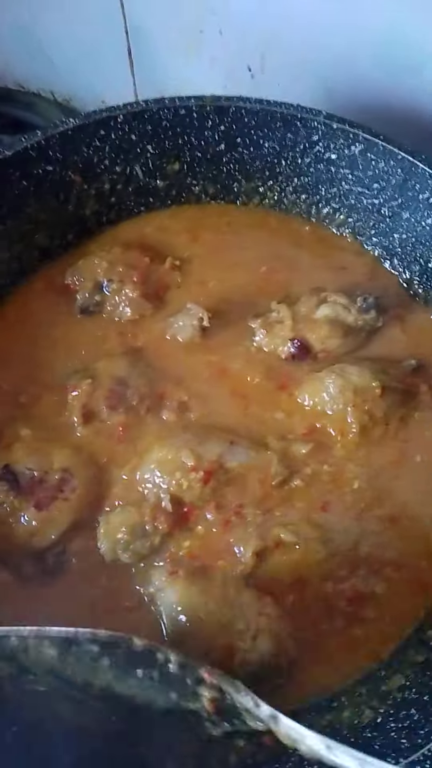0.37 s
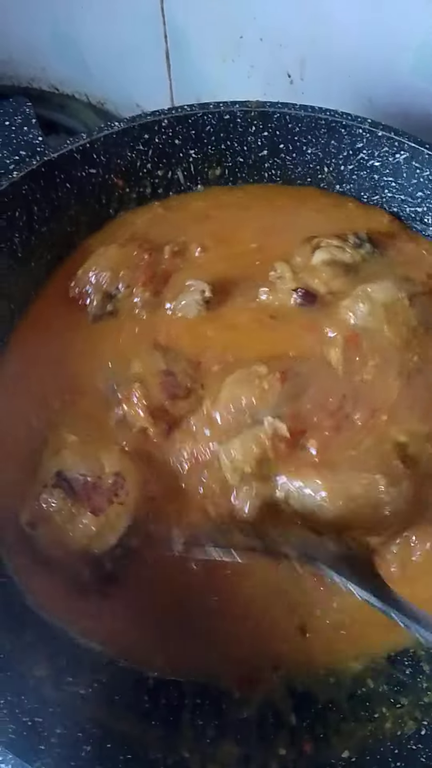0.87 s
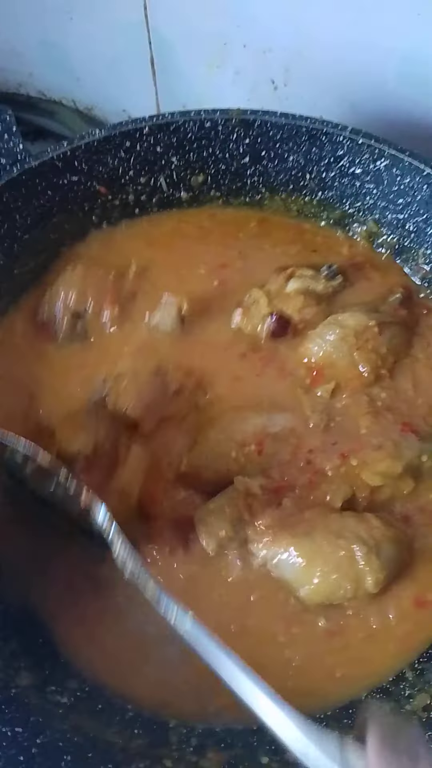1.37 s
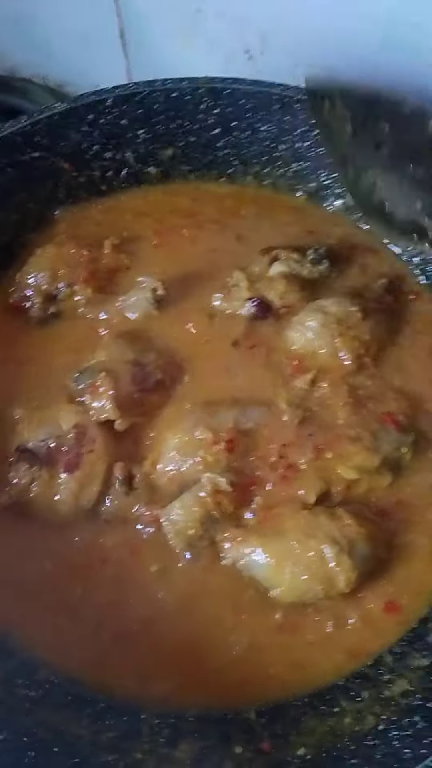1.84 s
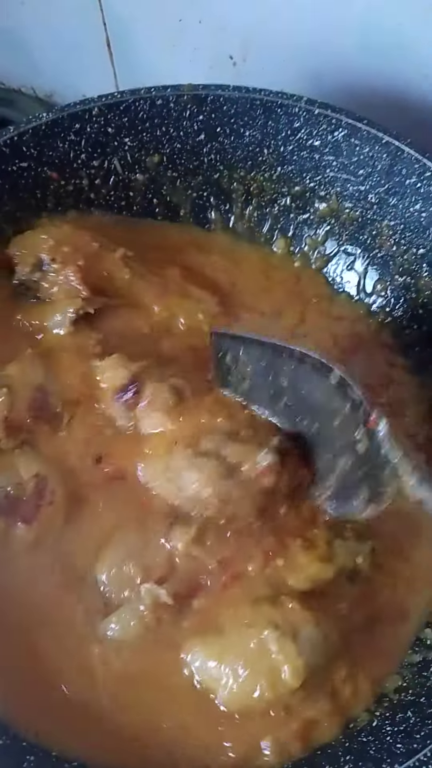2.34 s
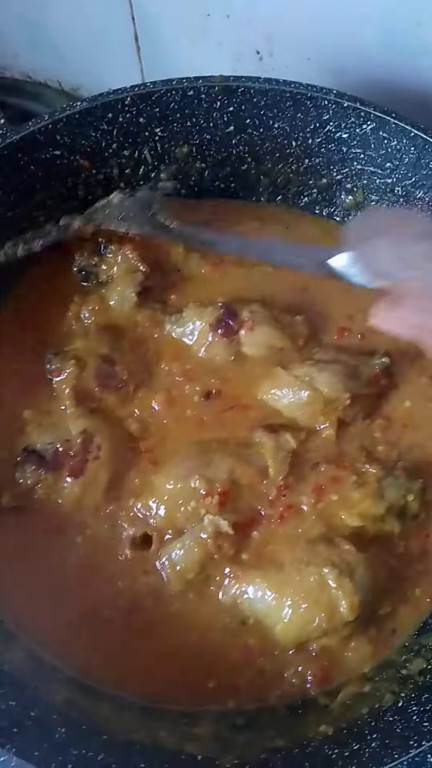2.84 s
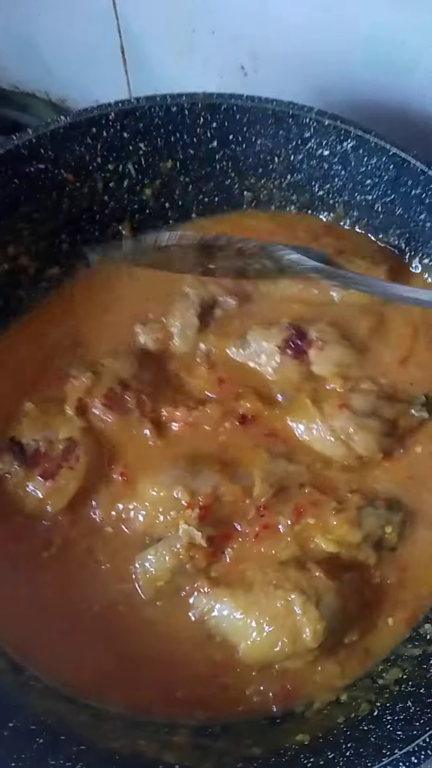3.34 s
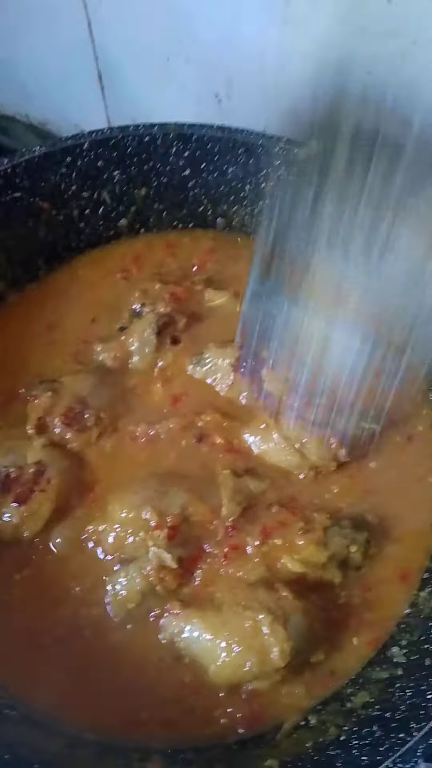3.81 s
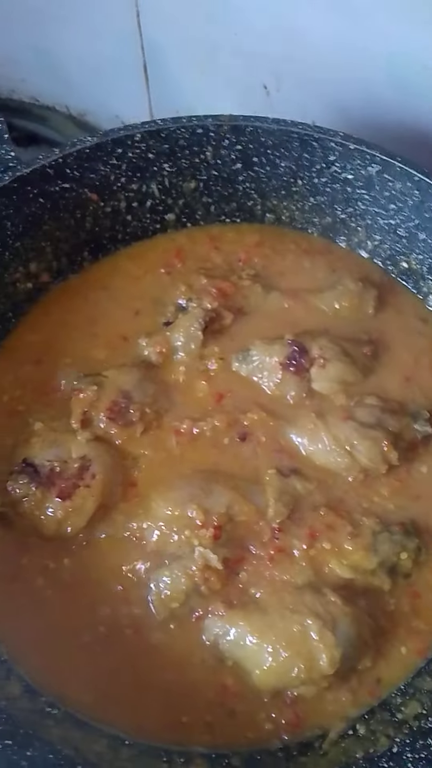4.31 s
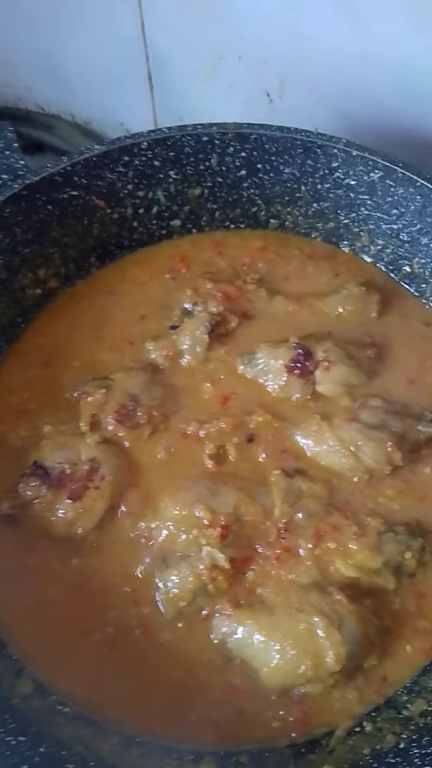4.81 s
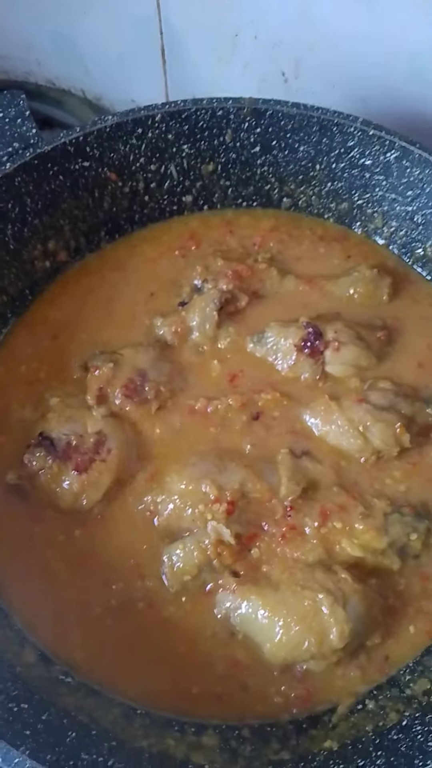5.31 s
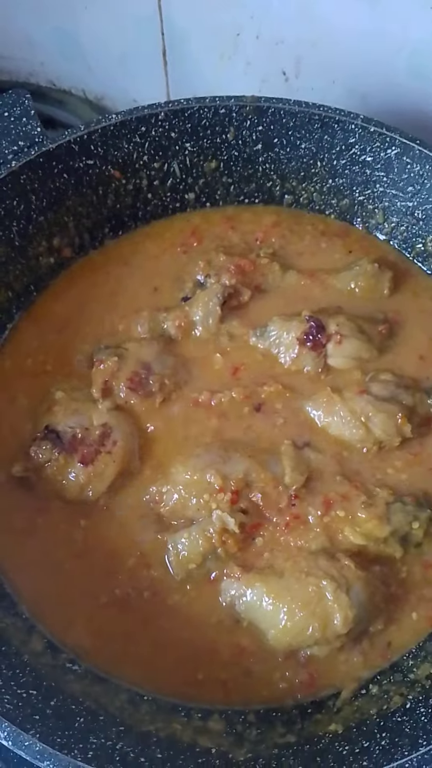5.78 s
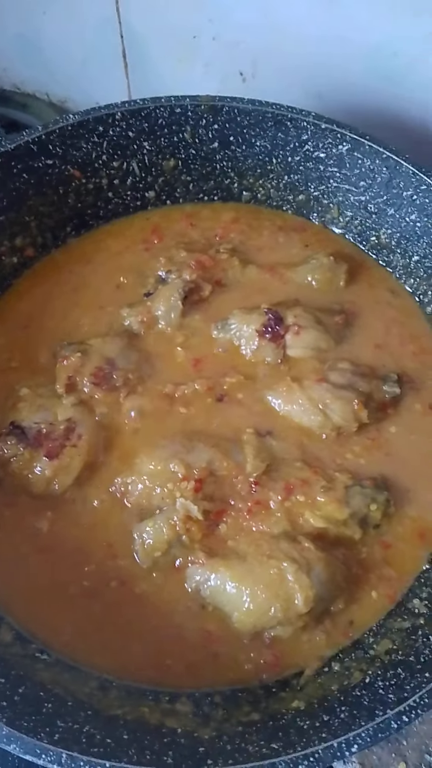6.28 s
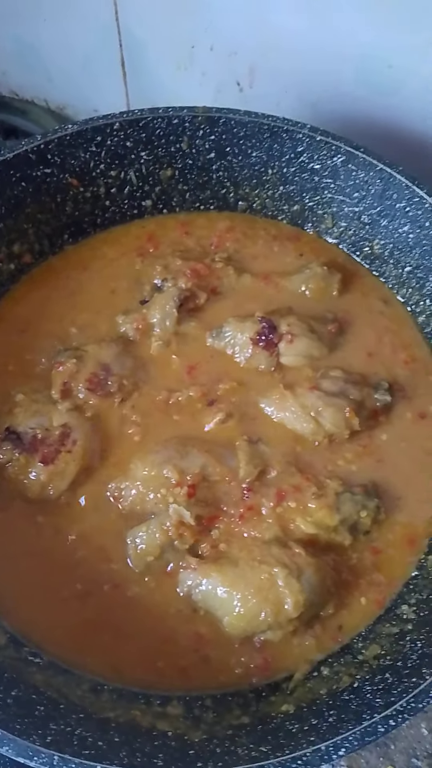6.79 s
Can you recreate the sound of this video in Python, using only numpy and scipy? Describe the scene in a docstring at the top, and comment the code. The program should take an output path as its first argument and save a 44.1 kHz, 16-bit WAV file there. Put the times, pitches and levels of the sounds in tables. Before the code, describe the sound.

Chicken simmers with small plopping bubbles and fine fat spits as a metal spatula knocks and scrapes a wok, then is set down ringing.

```python
"""Chicken simmering in a wok

Bubbles plop as short decaying sines and fat spits as pings in puffs of noise, over a hush of shaped noise.
A steel spatula lands on a coated wok and scrapes it: blows and uneven slips excite the modes of the metal.
It is then laid on a metal rest that rings, and one knock sounds on the counter; a few low bumps lie beneath.
Tiles answer with discrete echoes and a small kitchen with a decaying tail of noise."""
import sys
import numpy as np
from scipy import signal
from scipy.fft import rfft, irfft, next_fast_len
from scipy.io import wavfile
from scipy.ndimage import uniform_filter1d, map_coordinates

SR = 44100
rng = np.random.default_rng(int(sys.argv[2]) if len(sys.argv) > 2 else 0)


def generate_wav(signal):
    """Clip the signal to [-1, 1] and save it as 16-bit WAV at the path in sys.argv[1]."""
    frames = np.transpose(np.atleast_2d(signal))
    scaled = np.clip(frames, -1, 1) * 32767
    pcm = np.round(scaled).astype(np.int16)
    wavfile.write(sys.argv[1], SR, pcm)


def volts_from_decibels(level):
    """Turn decibel levels (scalar or array-like) into linear amplitude factors."""
    exponent = np.asarray(level, float) / 20
    return 10 ** exponent


N = 304731  # length in samples

# Scraping strokes, a list of contact points each: start_s, drone_level_db, favoured_pitch_hz,
# rasp_level_db, hiss_over_rasp_db, lowest_modes_over_drone_db
SCRAPE_STROKES = [
    [(0.47, -42.5, 918, -45, -4, -4.5), (0.506, -61, 802, -58, 1, 2), (0.58, -36, 850, -46, -1, -9),
     (0.602, -44, 764, -56.5, 1.5, -2), (0.662, -39, 708, -58.5, 4, -9), (0.688, -41, 1000, -61, 9, -11),
     (0.722, -30, 1060, -54.5, -2, -12), (0.744, -41, 985, -56.5, 2, -15.5),
     (0.876, -32, 720, -55, -4, -11.5), (0.964, -43.5, 640, -69.5, 1, -15), (1.0, -66, 706, -58, 0, -10)],
    [(1.31, -50, 812, -46, -11, 7), (1.38, -47.5, 753, -59.5, 3.5, -6), (1.456, -33.5, 790, -56.5, 5, -11),
     (1.494, -49, 910, -61.5, 7, 0), (1.53, -40, 1030, -63, 4, -4), (1.56, -67, 901, -89, -5, 12),
     (1.58, -58, 719, -80, -2, 0)],
    [(2.0, -49, 1060, -36, -13, -9), (2.022, -40, 1060, -54.5, -3, -15), (2.046, -55.5, 953, -57, -6, 14),
     (2.086, -44.5, 757, -67.5, 0, -8), (2.142, -45, 780, -52, -10, -5), (2.184, -52, 689, -62, -9, 13),
     (2.226, -32, 678, -53.5, -4.5, -5.5), (2.296, -43.5, 1010, -52, -12, -6),
     (2.4, -77, 727, -70, 5.5, -14)],
    [(2.74, -68, 686, -75, -14, -8), (2.758, -60, 776, -52, -6.5, -1), (2.79, -72, 927, -74, -2, 12)],
    [(2.89, -44, 1110, -52.5, 1, -22), (2.944, -43, 1100, -50.5, 8.5, -13.5),
     (2.984, -54.5, 1200, -61, -4, 2), (3.022, -69, 1130, -65, -6, -8), (3.05, -72, 837, -82, 0, -4)],
    [(3.2, -78, 1020, -84, -2, 14), (3.212, -51, 1040, -65, -2, 1.5), (3.256, -65, 831, -69, -2, 8),
     (3.304, -64, 1500, -64, -8, -12), (3.39, -65, 887, -72, 3, -14)],
]
# Spatula chattering as it settles on its rest: start_s, rasp_level_db
SETTLING_CHATTER = [(4.77, -42.5), (4.798, -49), (4.804, -59), (4.824, -55), (4.846, -42), (5.05, -62),
                    (5.12, -66)]
# Knocks on the wok: start_s, crack_level_db, body_level_db, share_of_free_ring_time (ratio),
# then two favoured pitches: pitch_hz, pitch_hz
WOK_KNOCKS = [(.4495, -27, -27.5, 0.18, 2100, 3080), (.4626, -32, -41, 0.1, 2130, 2800),
              (.568, -42, -31, 0.32, 1590, 2070), (.702, -50.5, -30, 0.2, 690, 1050),
              (.7085, -60, -21.5, 0.16, 1080, 1590), (.7187, -52, -45, 0.091, 890, 1590),
              (.7235, -62, -30, .14, 1090, 1590), (1.288, -35, -22.5, 0.28, 2080, 2950),
              (1.296, -44, -23, 0.11, 1100, 2100), (1.526, -70, -31.5, .14, 1100, 1460),
              (1.989, -42.5, -27, 0.45, 1026, 2090), (2.882, -39.5, -26, .8, 1192, 1820)]
# Knocks on the rest and on the counter: the same columns with one favoured pitch_hz
REST_KNOCKS = [(4.7511, -32.5, -23.5, 0.11, 736), (4.804, -41.5, -44, 0.44, 720),
               (4.8319, -43, -31, .3, 710), (4.8435, -39, -24, 1, 865)]
COUNTER_KNOCKS = [(5.3322, -49.5, -24, 0.77, 1380)]
# Vibration modes of each body: pitch_hz, level_db, free_t60_s
WOK_MODES = [(270, -10, .15), (368, -5, .15), (484, -4, .22), (581, -6, .15), (714, 0, .2), (830, -10, .15),
             (935, -5, .15), (1090, 0, .16), (1270, -11, .35), (1400, -6, .14), (1590, -5, .15),
             (1776, -13, .2), (2070, -11, .2), (2440, -15, .15)]
REST_MODES = [(170, -11, .1), (290, -11, .12), (400, -11, .15), (511, -8, .35), (620, -10, .2),
              (738, -5, .4), (834, -8, .65), (1000, -9, .35), (1125, -7, .4), (1276, -6, .55),
              (1314, -5, .45), (1544, -13, .5), (1755, -8, .4), (1873, -10, .45), (2035, -13, .75),
              (2218, -15, .45), (2439, -15, .9), (3397, -14, .27), (5399, -19, .3), (7617, -19, .25),
              (7908, -20, .25)]
COUNTER_MODES = [(450, -9, .05), (1080, -8, .06), (1486, 4, .085), (2046, -9, .07), (2632, -9, .07),
                 (4150, -14, .05), (4963, -14, .07)]
BLADE_MODES = [(2500, -5, .05), (2800, -4, .07), (3215, -4, .05), (3790, -4, .06), (4870, -10, .04),
               (6160, -11, .05)]
# Bubbles that stand out: start_s, level_db, starting_pitch_hz
CLEAR_BUBBLES = [(.09, -38, 1470), (.117, -40, 2140), (.144, -37.5, 840), (.222, -39.5, 1500),
                 (.379, -37, 1530), (1.016, -40, 900), (1.616, -36, 2780), (1.671, -36.5, 990),
                 (1.947, -35.5, 1310), (2.495, -33.5, 2600), (2.547, -31, 2720), (3.211, -39, 1470),
                 (3.227, -48, 940), (3.292, -44, 1440), (3.305, -36, 1490), (3.349, -34.5, 2660),
                 (3.439, -42.5, 1050), (3.528, -43, 834), (3.617, -39, 2700), (3.719, -38.5, 1080),
                 (3.781, -40.5, 1000), (3.825, -30, 1240), (3.906, -42, 806), (4.017, -40.5, 1210),
                 (4.086, -44, 1080), (4.335, -40, 2720), (4.482, -34.5, 1720), (4.536, -36.5, 1040),
                 (4.608, -43, 1190), (4.659, -43, 1080), (5.154, -34.5, 970), (5.205, -40, 1210),
                 (5.434, -39, 1090), (5.494, -37.5, 1480), (5.545, -38, 1470), (5.771, -40, 990),
                 (5.808, -31.5, 1085), (5.861, -42, 1120), (5.933, -38.5, 1440), (5.977, -41, 2920),
                 (6.015, -29.5, 1640), (6.206, -43, 1300), (6.249, -45, 1070), (6.368, -37.5, 1030),
                 (6.43, -36.5, 1090), (6.466, -39, 1130), (6.476, -36, 1170), (6.518, -33, 1820),
                 (6.717, -42.5, 1100), (6.813, -38.5, 1870), (6.824, -35, 920)]
# Spits of fat that stand out: start_s, ping_level_db, splash_level_db
CLEAR_SPITS = [(.0887, -43, -55), (.1363, -47.5, -50.5), (.3074, -42.5, -50.5), (.9981, -41, -59),
               (1.1413, -38, -48.5), (1.6172, -45, -53), (1.6284, -44.5, -49.5), (1.8527, -35, -50),
               (1.9818, -33, -38), (2.2732, -39, -61), (2.2865, -31.5, -59), (2.3133, -44, -64),
               (2.3515, -43.5, -68), (2.4954, -33, -45.5), (2.5452, -38, -48), (3.245, -39.5, -49),
               (3.3675, -42, -66), (3.5987, -44.5, -52), (3.6335, -37, -46.5), (3.7604, -47, -49),
               (4.2393, -44, -55), (4.523, -43.5, -70), (5.42, -43, -62), (5.5517, -44.5, -48.5),
               (5.68, -48, -56.5), (5.9338, -35.5, -42.5), (6.1404, -44, -54), (6.2827, -40.5, -69),
               (6.3083, -42, -47), (6.317, -37, -53), (6.5171, -47.5, -55), (6.5572, -43.5, -70),
               (6.6185, -37.5, -48), (6.8662, -45, -52)]
# Liveliness of the simmer: time_s, gain_db
SIMMER_LIVELINESS = [(0, -0.5), (.4, -1), (1.1, -3.5), (1.7, -2), (2.6, -3), (3.1, -2.5), (3.5, -4.5),
                     (4, -2.5), (4.6, -2), (5.3, -0.5), (5.7, -3), (6.3, -1.5), (6.9, -2.5)]
# Hush of kitchen, burner and fizz, before liveliness: frequency_hz, density_db (dB per Hz)
HUSH_SPECTRUM = [(25, -77), (32, -86.5), (48, -76.5), (75, -85), (100, -76), (165, -88.5), (280, -82),
                 (450, -90.5), (720, -87.5), (1300, -99.5), (2200, -100), (3300, -98), (5000, -107),
                 (7000, -109), (11000, -108), (16000, -106.5)]
# Dull bumps: start_s, level_db, pitch_hz, length_s
LOW_BUMPS = [(0.187, -43.5, 72.4, 0.034), (5.363, -51.5, 78.1, 0.022), (5.762, -46, 91.5, 0.07),
             (6.672, -51, 76.6, 0.04)]
# Echoes off the tiles: delay_s, level_db
TILE_ECHOES = [(.0047, -32), (0.0113, -13.5), (0.013, -48)]
# Decay of the kitchen's tail: frequency_hz, t60_s
KITCHEN_DECAY = [(200, 0.57), (1500, 0.32), (8000, 0.53), (15000, 0.038)]


def scraping():
    """Stick-slip friction: uneven slips drive the wok's modes, other ones as the contact spot moves."""
    spot_lift_db, spot_octaves, wander_db = 8, 0.81, 3.5
    lowest_hz = 430  # the wok's lowest modes lie under it
    drone_db, spot_hz, rasp_db, hiss_db, lowest_db = curves(SCRAPE_STROKES)
    judder = wobble(70)
    t = np.arange(SR // 5) / SR
    hz, db = np.transpose(WOK_MODES)[:2, :, None]
    octaves_away = np.log2(hz / np.maximum(spot_hz, 100))
    drive = volts_from_decibels(db + spot_lift_db * np.exp(-(octaves_away / spot_octaves) ** 2))
    lowest = hz[:, 0] < lowest_hz
    for group, level_db in ((lowest, drone_db + lowest_db), (~lowest, drone_db)):
        drive[group] *= volts_from_decibels(level_db) / np.linalg.norm(drive[group], axis=0)
    grain = volts_from_decibels(3.1 * judder + 3.5 * rng.standard_normal(N))
    drone = np.zeros(N)
    for mode, push in zip(WOK_MODES, drive):
        # each mode's drive wanders on its own
        slips = unit(rng.standard_normal(N) * grain * volts_from_decibels(wander_db * wobble(14)))
        ring = ringing([mode], 0.22, 0, t)
        drone += signal.fftconvolve(push * slips, ring / np.linalg.norm(ring))[:N]
    return drone + grit(rasp_db, rasp_db + hiss_db, judder)


def grit(rasp_db, hiss_db, judder):
    """Sliding friction of rough surfaces: a rasp and a hiss of noise share one judder."""
    noise = rng.standard_normal((2, N)) * volts_from_decibels(0.87 * judder + 2.9 * wobble(300))
    rasp = band(volts_from_decibels(rasp_db) * noise[0], 1270, 3500)
    hiss = band(volts_from_decibels(hiss_db) * noise[1], 8900, 16400)
    return rasp + hiss


def knocks():
    """Impact excitation: each landing cracks and rings both the struck body and the spatula blade."""
    held_crack_s, free_crack_s = 0.031, 0.066  # crack t60 at zero share, and what a full share adds
    held_flutter_db, settling_hiss_db = 5, -3  # flutter shrinks as the ring grows free; hiss over rasp
    crack, clack, ring = np.zeros((3, N))
    t = np.arange(SR // 2) / SR
    # clack over crack dB, blade over crack dB, favoured blade pitch Hz, lift of favoured body modes dB
    for table, body, clack_db, blade_db, blade_hz, lift_db in (
            (WOK_KNOCKS, WOK_MODES, -0.82, 2.7, 3010, 16),
            (REST_KNOCKS, REST_MODES, 3, 11, 3790, 8.5),
            (COUNTER_KNOCKS, COUNTER_MODES, 5, -3, 4870, -3.5)):
        for s, db, body_db, share, *spots_hz in table:
            envelope = volts_from_decibels(-60 * t / (held_crack_s + free_crack_s * share)) * (1 - np.exp(-t / 0.00036))
            burst = envelope * rng.standard_normal((2, len(t)))
            add(crack, s, volts_from_decibels(db) * burst[0])
            add(clack, s, volts_from_decibels(db + clack_db) * burst[1])
            rough_db = held_flutter_db * max(1.2 - share, 0)
            add(ring, s, volts_from_decibels(body_db) * ringing(body, share, 0.8, t, spots_hz, lift_db, rough_db))
            add(ring, s, volts_from_decibels(db + blade_db) * ringing(BLADE_MODES, 0.48, 3.0, t, (blade_hz,)))
    edge = volts_from_decibels(-13.5) * band(crack, 12300, 14300)  # the crack's very top
    noise = edge + band(crack, 7700, 13300) + band(clack, 810, 5900)
    rasp_db, = curves([SETTLING_CHATTER])
    return noise + ring + grit(rasp_db, rasp_db + settling_hiss_db, wobble(70))


def ringing(modes, share, scatter_db, t, spots_hz=(), lift_db=14, rough_db=0):
    """Modal superposition: contact shortens and flutters the modes; the struck spot reweights them."""
    hz, db, t60 = np.transpose(modes)[:, :, None]
    spot_db = sum(lift_db * np.exp(-(np.log2(hz / spot) / 0.17) ** 2) for spot in spots_hz)
    gain = volts_from_decibels(db + spot_db + scatter_db * rng.standard_normal(db.shape))
    knots = rng.standard_normal((len(hz), 40))  # 70 a second
    flutter = volts_from_decibels(rough_db * np.array([np.interp(t, np.arange(40) / 70, row) for row in knots]))
    decay = volts_from_decibels(-60 * t / (t60 * share))
    ring = np.sum(gain * flutter * decay * np.sin(2 * np.pi * hz * t), 0)
    return ring * (1 - np.exp(-t / 0.0003)) / np.linalg.norm(gain)


def bubbles():
    """Bubble resonance: each burst is a plop; as the skin tears it throws off two smaller, higher ones."""
    crowd = rng.random((19, 3))
    crowd_hz = 850 * 3.0 ** crowd[:, 2] ** 3
    middling = np.transpose([crowd[:, 0] * N / SR, -43 - 7 * crowd[:, 1], crowd_hz])
    s, db, hz = np.transpose([*CLEAR_BUBBLES, *middling])
    draw = rng.random((len(s), 2, 3))
    small_s = s[:, None] + .009 * draw[..., 0]
    small_db = db[:, None] - (12 + 7 * draw[..., 1])
    small_hz = hz[:, None] * (1.17 + 1.27 * draw[..., 2])
    small = plops(small_s.ravel(), small_db.ravel(), small_hz.ravel(), cycles=2.6)
    return plops(s, db, hz, cycles=2.34) + small


def plops(s, db, hz, cycles):
    """Damped oscillation: sines that rise slightly in pitch and fall by 1/e in the given cycles."""
    t = np.arange(SR // 50) / SR
    life = (cycles / hz)[:, None]
    phase = 2 * np.pi * hz[:, None] * t * (1 + 0.015 * t / life)
    envelope = np.exp(-t / life) * (1 - np.exp(-t / .0003))
    rows = volts_from_decibels(db)[:, None] * np.sin(phase) * envelope
    at = np.round(s * SR).astype(int)[:, None] + np.arange(len(t))
    return np.bincount(at.ravel(), rows.ravel(), N + len(t))[:N]


def spits():
    """Flash boiling in fat: a short ping near the microphone's treble resonance, in a puff of noise."""
    ping_hz, ping_spread_hz = 8190, 300
    hiss_db, tick_db = -15, 2.5  # hiss over ping, tick at the very top over splash
    high, low, top = np.zeros((3, N))
    t = np.arange(SR // 50) / SR
    crowd = rng.random((20, 2))  # faint spits at random times
    faint_db = -48 - 8 * crowd[:, 1]
    faint = np.transpose([crowd[:, 0] * N / SR, faint_db, faint_db - 10])
    rows = [*CLEAR_SPITS, *faint]
    for s, db, splash_db in rows:
        puff = volts_from_decibels(-60 * t / 0.027) * rng.standard_normal((3, len(t)))
        add(top, s, volts_from_decibels(splash_db + tick_db - 60 * t / 0.0047) * puff[2])
        add(high, s, volts_from_decibels(db + hiss_db) * puff[0])
        add(low, s, volts_from_decibels(splash_db) * puff[1])
    s, db, _ = np.transpose(rows)
    hz = ping_hz + ping_spread_hz * rng.standard_normal(len(s))
    noise = band(top, 12700, 15700) + band(high, 9700, 12000) + band(low, 980, 3820)
    return noise + plops(s, db, hz, cycles=6.06)


def simmer():
    """Statistical superposition: flecked hush and crowds of faint bubbles all follow the boil."""
    lively = volts_from_decibels(np.interp(np.arange(N) / SR, *np.transpose(SIMMER_LIVELINESS)))
    z = signal.stft(rng.standard_normal(N), nperseg=256)[2]
    field = uniform_filter1d(uniform_filter1d(rng.standard_normal(z.shape), 8, 0), 4, 1)
    depth_db = np.linspace(2.4, .3, len(z))[:, None]  # the treble is steadier
    patchy = unit(signal.istft(z * volts_from_decibels(depth_db * unit(field)), nperseg=256)[1][:N])
    hush = filtered(patchy, lambda hz: volts_from_decibels(along(HUSH_SPECTRUM, hz)) * np.sqrt(SR / 2))
    big, small = rng.random((500, 3)), rng.random((900, 3))
    big_db = -61 - 3.6 * np.log(big[:, 1] + 0.03)
    small_db = -64 - 3.9 * np.log(small[:, 1] + .05)
    plop = plops(big[:, 0] * N / SR, big_db, 750 * 3.2 ** big[:, 2], cycles=4.2)
    fizz = plops(small[:, 0] * N / SR, small_db, 1800 * 2.57 ** small[:, 2], cycles=3.4)
    return lively * (hush + plop + fizz)


def bumps():
    """Amplitude modulation: low sines of a few cycles swell and fade under an arch."""
    out = np.zeros(N)
    for s, db, hz, length in LOW_BUMPS:
        t = np.arange(round(length * SR)) / SR
        arch = np.sin(np.pi * t / length) ** 0.82
        add(out, s, volts_from_decibels(db) * arch * np.sin(2 * np.pi * hz * t))
    return out


def kitchen(x):
    """Room response by convolution: tile echoes, then a tail whose frequencies die at their own speeds."""
    echoes = np.zeros(SR // 20)
    for s, db in TILE_ECHOES:
        echoes[round(s * SR)] = volts_from_decibels(db)
    hz, _, z = signal.stft(rng.standard_normal(SR // 2), SR, nperseg=256)
    t = np.arange(z.shape[1]) * 128 / SR
    tail = signal.istft(z * volts_from_decibels(-60 * t / along(KITCHEN_DECAY, hz)[:, None]), SR, nperseg=256)[1]
    tail = np.pad(volts_from_decibels(-12) * tail / np.linalg.norm(tail), (SR // 200, 0))  # starts 5 ms late
    return signal.fftconvolve(x, echoes)[:N] + signal.fftconvolve(x, tail)[:N]


def curves(tables):
    """Linear interpolation of each column to samples; levels (columns 1 and 3) sink between tables."""
    rows = []
    for table in tables:
        first, last = np.array(table[0], float), np.array(table[-1], float)
        first[1:4:2], last[1:4:2] = -90, -90
        rows += [(first[0] - .008, *first[1:]), *table, (last[0] + 0.013, *last[1:])]
    s, *cols = np.transpose(rows)
    return [np.interp(np.arange(N) / SR, s, c) for c in cols]


def unit(x):
    """Normalization to an rms of 1."""
    return x / np.sqrt(np.mean(x ** 2) + 1e-20)


def along(points, hz):
    """Interpolation of (Hz, value) points on a logarithmic frequency axis."""
    f, v = np.transpose(points)
    return np.interp(np.log(hz + 1), np.log(f + 1), v)


def wobble(rate):
    """Spline interpolation: a smooth random curve with rate knots a second."""
    knots = rng.standard_normal(int(N * rate / SR) + 4)
    return map_coordinates(knots, [np.arange(N) * rate / SR])


def filtered(x, response):
    """Linear filtering: the spectrum times a complex response of frequency."""
    m = next_fast_len(N + SR // 2)
    return irfft(rfft(x, m) * response(np.fft.rfftfreq(m, 1 / SR)), m)[..., :N]


def band(x, lo_hz, hi_hz):
    """Causal band-pass filtering, scaled so that white noise keeps about its rms."""
    sos = signal.butter(2, [lo_hz, min(hi_hz, SR / 2 - 100)], "band", fs=SR, output="sos")
    return signal.sosfilt(sos, x) * np.sqrt(SR / 2 / (hi_hz - lo_hz))


def add(track, s, sound):
    """Superposition: mixes a sound into the track at time s."""
    part = track[round(s * SR):][:len(sound)]
    part += sound[:len(part)]


def scene():
    """Radiation and superposition: pans and bubbles are too small to radiate deep bass; the room answers."""
    near = scraping() + knocks() + bubbles() + spits()
    near = filtered(near, lambda hz: (1j * hz / (1j * hz + 150)) ** 3)
    return (near + kitchen(near) + simmer() + bumps())[None]


def band_limit(x):
    """A steep low-pass at the top of the band."""
    return signal.sosfilt(signal.butter(12, 16500, fs=SR, output="sos"), x)


def record(dry):
    """Cavity and duct resonance: the microphone port has two close resonances in the treble."""
    def port(hz):
        cavity = 7800 ** 2 / (7800 ** 2 - hz ** 2 + 1j * hz * 1500)
        duct = 1 + volts_from_decibels(-4.0) * 1j * hz * 1400 / (8800 ** 2 - hz ** 2 + 1j * hz * 1400)
        return cavity * duct
    return band_limit(filtered(dry, port))


dry = scene()
out = record(dry)
generate_wav(out)
```